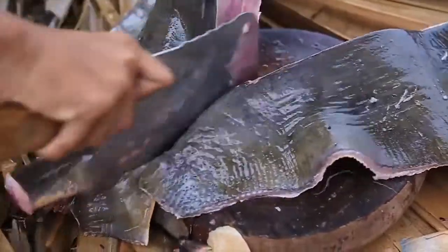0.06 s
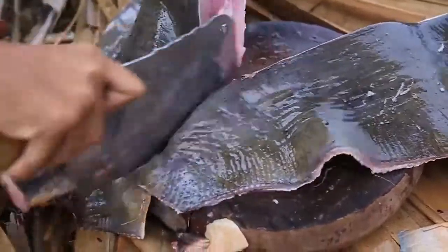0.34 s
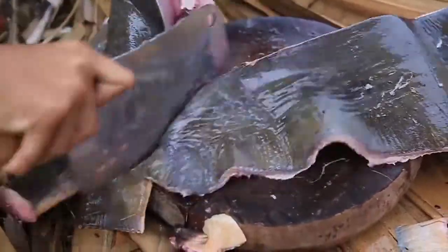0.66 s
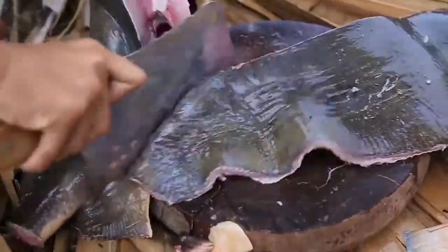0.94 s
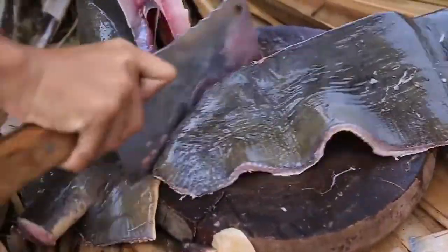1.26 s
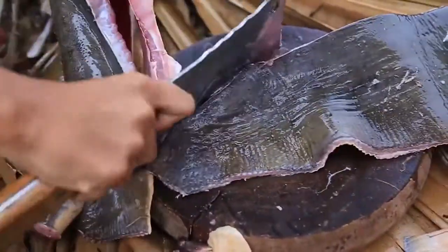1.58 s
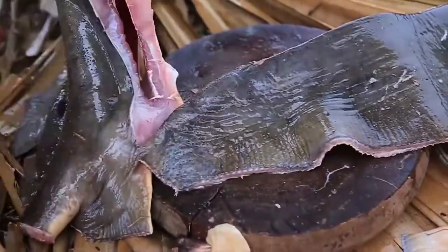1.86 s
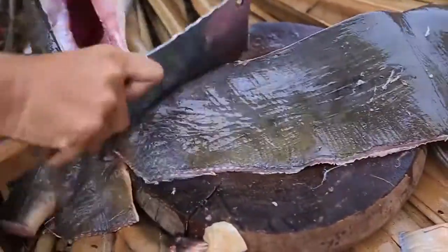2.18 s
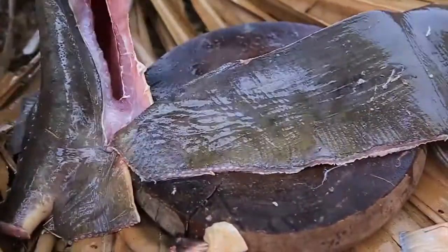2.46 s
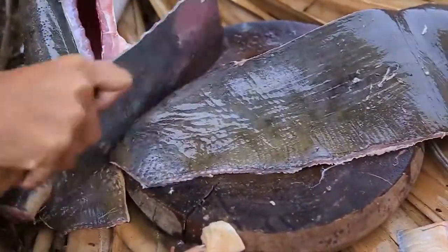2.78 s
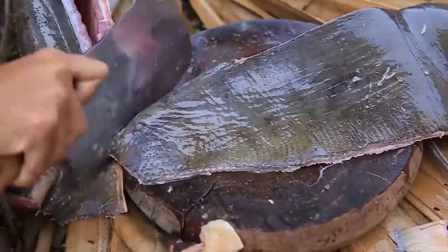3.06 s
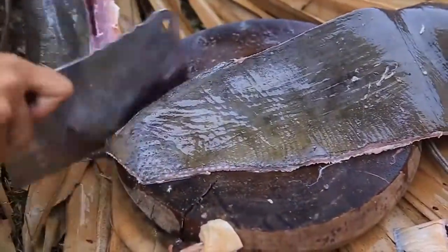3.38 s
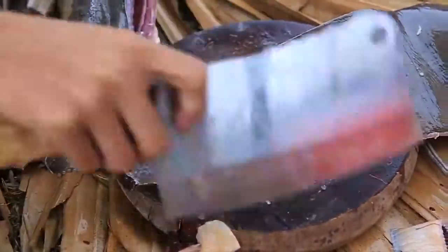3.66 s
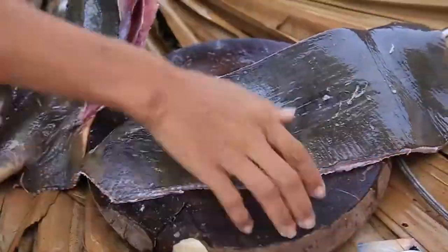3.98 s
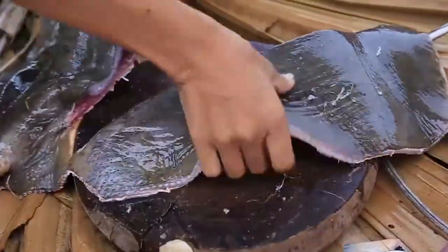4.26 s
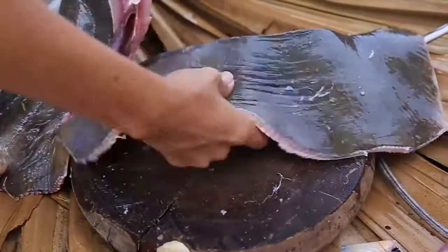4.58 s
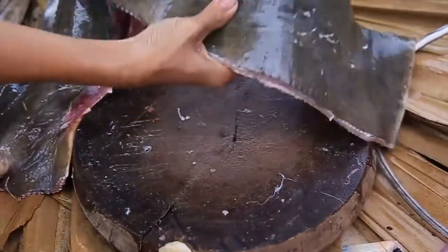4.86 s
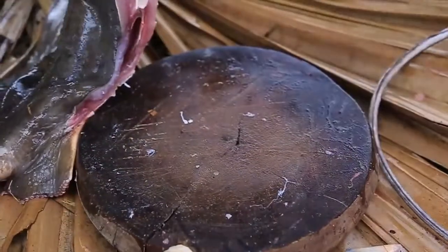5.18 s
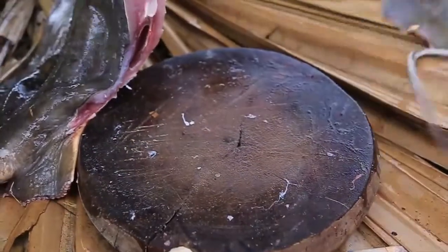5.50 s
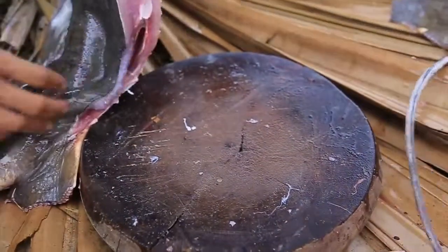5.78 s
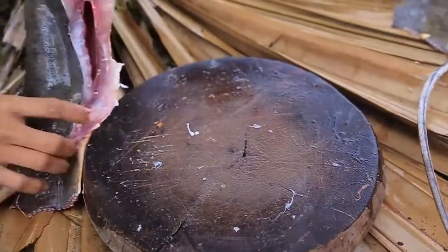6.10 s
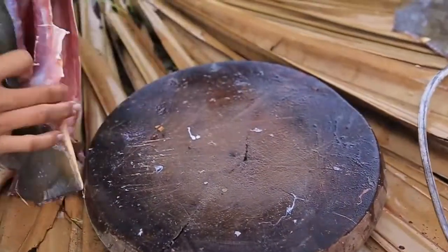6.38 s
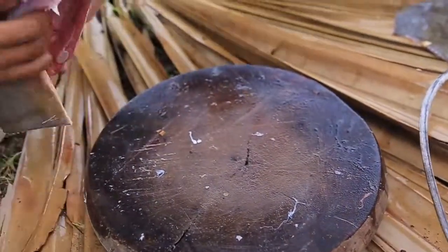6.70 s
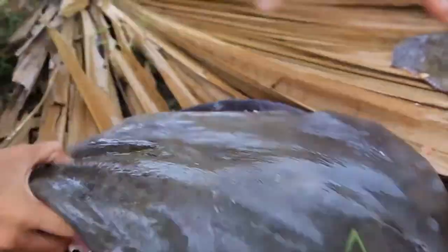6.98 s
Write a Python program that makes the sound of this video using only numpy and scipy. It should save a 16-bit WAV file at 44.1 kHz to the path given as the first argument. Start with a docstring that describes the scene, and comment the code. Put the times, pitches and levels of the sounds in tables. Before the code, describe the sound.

Wet blade scraping, two loud knocks on wood, then fish slapping onto dry leaves and a block, with birds and a faint engine behind.

```python
"""Cutting fish in an open yard

Close to the microphone a cleaver scrapes the wet skin of a big fish on a round wooden block, then
chops through it. A tray is moved, and slabs slap down on dry palm leaves and on the block.
Small birds chirp farther off, a slow diesel engine thumps far away and a light breeze rumbles.
The loud blows overload the recorder and duck its gain."""
import sys
import numpy as np
from scipy import signal
from scipy.fft import rfft, irfft, next_fast_len
from scipy.io import wavfile
from scipy.ndimage import uniform_filter1d

SR = 44100
rng = np.random.default_rng(int(sys.argv[2]) if len(sys.argv) > 2 else 0)


def store_wav(level_fs):
    """Save 16-bit WAV to argv[1]."""
    pcm = np.round(np.clip(np.atleast_2d(level_fs), -1, 1) * 32767)
    wavfile.write(sys.argv[1], SR, pcm.T.astype(np.int16))


N = 319267
TIME = np.arange(N) / SR

# cleaver blows: t/s, force/dB, contact/ms, crack of skin and bone/dB, block pitch factor, ground jolt/dB
BLOWS = [(2.1884, 12, 0.58, -6.5, 1.01, 5.5), (2.316, -4.5, 1.58, -40, 1.01, -18),
         (2.412, -32.5, 1.03, -52, 0.99, -50), (2.6817, 11.5, 0.52, -5.5, 0.95, -0.5),
         (3.2239, -3, 1.63, -46, 1.035, -45), (3.2318, -14.5, 1.5, -58, 0.92, -45)]
# modes of the block with the blade in it: f/Hz, level/dB, t60/s
BLOCK_MODES = [(430, -14, 0.034), (619, -3, 0.03), (718, -3, 0.024), (903, 6, 0.019), (1380, 2.5, 0.021),
               (1612, -0.5, 0.018)]
# blade on the fish: t/s, length/s, hiss/dB, coarse slips over the hiss/dB
SCRAPE_STROKES = [(0, 0.1, -37.5, -1.5), (.151, 0.071, -36, -0.5), (.257, 0.14, -44, -4.5),
                  (.44, 0.1, -36, -4.5), (.588, 0.12, -41, -7.5), (.735, 0.098, -41.5, 2),
                  (.88, 0.1, -47.5, -3), (1.039, .082, -41.5, 6), (1.135, 0.15, -46, -9.5),
                  (1.317, 0.092, -44, 0.5)]  # about seven a second
BLADE_RESTS = [(0.15, 1.284, -55.5, 3.5)]  # staying on the skin between strokes
BLADE_DRAWS = [(2.832, 0.16, -41, -5.5), (3.018, 0.087, -41, 5.5), (3.204, 0.071, -39, -24),
               (3.299, 0.179, -43, -3.5)]  # pulled out of the cut
# resonances of the steel: f/Hz, width/Hz, level/dB
DAMPED_BLADE_MODES = [(3460, 220, 0), (5250, 440, -9), (10400, 960, -4.5)]  # against the flesh
FREE_BLADE_MODES = [(4170, 110, -5), (5140, 150, 7.5), (6100, 300, 6)]  # sliding free
# the blade sticks on the skin: t/s, length/s, start f/Hz, final f/Hz, level/dB
BLADE_SQUEAKS = [(0.053, 0.041, 3800, 3670, -35), (0.191, 0.042, 2380, 1370, -35),
                 (0.93, 0.067, 1170, 1210, -45), (1.137, 0.039, 1390, 2650, -39),
                 (2.82, 0.09, 6030, 5700, -47)]
# landings: t/s, thud/dB, splash/dB, trapped air f/Hz; the first row on the leaves is the tray set down, the
# rest are parts of slabs landing
LANDINGS_ON_LEAVES = [(3.9793, -29, -9.5, 1250), (5.5457, -20, -25, 796), (5.5507, -14, -28, 1240),
                      (5.553, -14, -16, 1090), (5.557, -15, -21, 1460), (5.5636, -19, -18, 1380),
                      (5.5717, -3, -9, 1700), (5.5811, -21, -13, 1400), (5.589, -23, -26, 1100),
                      (5.5994, -30, -18, 1500)]
SLAPS_ON_BLOCK = [(7.0265, -17, -32, 970), (7.039, -9, -24, 948), (7.048, -14.5, -21, 1750),
                  (7.0651, -6, -13, 475), (7.077, -15, -10, 1180), (7.08, -22, -6, 2090)]
# wet flesh spreads during a slap: t/s, length/s, level/dB
FLESH_SPREADS = [(5.548, 0.021, -14.5), (7.025, 0.058, -24)]
# snaps of scales, slime and leaf: t/s, tick/dB, low knock/dB
SHARP_SNAPS = [(0.445, -33, -27), (.5852, -20, -37), (.61, -7, -39), (0.7327, -44, -29.5),
               (1.2795, -31, -30), (1.3205, -38, -30), (1.3445, -20, -28), (1.3644, -16.5, -23),
               (1.404, -22, -45), (1.4314, -40, -27.5), (1.5257, -16, -30.5), (1.6621, -27, -32.5),
               (2.3421, -11.5, -36), (3.269, -10.5, -30.5), (3.378, -12.5, -47), (3.8824, -16.5, -43),
               (4.1664, -24, -41), (5.0236, -30, -34), (5.678, -7, -29), (5.714, -5, -18), (5.742, -2, -28),
               (5.81, -22, -26), (6.2623, -31, -62), (6.4735, -23, -60), (6.9711, -21, -36),
               (7.212, -18.5, -30)]
# sticky skin peels off the leaves: t/s, level/dB
SKIN_PEELS = [(5.849, -38.5), (5.9048, -37), (5.9666, -38), (6.0137, -37.5), (6.027, -45), (6.1138, -37.5),
              (6.2949, -41), (6.464, -37.5)]
# pushes on the dry leaves: t/s, level/dB, swell/s
LEAF_PUSHES = [(3.435, -37, 0.15), (3.886, -29.5, 0.0038), (3.92, -34, 0.0037), (3.991, -26, 0.0091),
               (5.02, -44.5, 0.062), (5.562, -14, 0.005), (5.747, -28.5, 0.064), (6.998, -31.5, 0.01),
               (7.07, -25, 0.032)]
# hand, tray and fish drag over the leaves: t/s, length/s, level/dB
LEAF_DRAGS = [(1.434, 0.47, -55.5), (2.766, 0.86, -54), (4.126, 0.33, -52), (4.472, 0.55, -50),
              (5.606, 0.55, -49), (6.152, 0.33, -54.5), (7.142, 0.1, -38)]
# bird calls, a clear peep dropping to a raspy tail:
# t/s, peep f/Hz, peep/dB, its octave/dB, tail length/s, tail f/Hz, tail/dB, rasp 0-1
TWO_PART_CALLS = [(3.591, 4090, -30.5, -44, 0.096, 3060, -38, 1),
                  (3.765, 4070, -32.5, -44, 0.12, 2670, -36.5, 0.56),
                  (4.116, 4200, -39.5, -54, 0.15, 2860, -40, 0.46),
                  (4.29, 4050, -41.5, -49, 0.102, 2850, -36.5, 0.37),
                  (4.476, 4100, -39, -51, 0.1, 2700, -40.5, 0)]
# whistles falling steeply, then slowly: t/s, length/s, start f/Hz, goal f/Hz, glide/s, level/dB, rasp 0-1
FALLING_WHISTLES = [(3.224, 0.094, 6330, 2410, 0.073, -33.5, 0.06),
                    (3.315, 0.12, 3700, 1905, .11, -37, 0.4), (5.078, 0.023, 4300, 1690, .013, -35, 0.9),
                    (5.137, 0.049, 4500, 3090, 0.015, -40, 0.5), (5.225, 0.05, 5200, 2930, 0.018, -38, .55),
                    (5.304, 0.013, 3300, 1600, 0.013, -35.5, 0.3),
                    (5.316, 0.048, 4700, 3250, 0.019, -39, 0.3),
                    (5.442, 0.014, 7200, 3950, 0.0094, -37, 0.25),
                    (5.455, 0.12, 4600, 2550, .04, -35, 0.45)]
# whistles on one pitch: t/s, length/s, f/Hz, level/dB, rasp 0-1
HELD_WHISTLES = [(4.602, 0.37, 3090, -40.5, 0.36), (4.662, .04, 5950, -38, 0.4),
                 (4.743, 0.14, 2950, -42.5, 0.9), (4.94, 0.38, 3420, -45.5, 0.26),
                 (5.338, 0.08, 3250, -40.5, 0), (5.471, 0.099, 3200, -41, 0)]
# running of the far engine: t/s, firing rate/Hz, level/dB
ENGINE_RUN = [(0, 22.3, -42.5), (1.9, 20.2, -42), (2.5, 20.8, -42), (3.3, 20.7, -42), (4.3, 20.85, -40.5),
              (6.3, 20.2, -39.5), (7.24, 20.3, -37)]
# strength of the breeze: t/s, level/dB
BREEZE_LEVELS = [(0, -44), (1.25, -40), (1.5, -43.5), (3.7, -43), (4.6, -39), (5.8, -44.5), (6.8, -37),
                 (7.24, -45)]
# spectra at the microphone: f/Hz, relative level/dB
FINE_SLIP_SPECTRUM = [(600, -23), (1800, 2), (2800, -8), (4000, 1), (5600, 0), (7000, -2.5), (9800, 0.5),
                      (11500, -7.5), (15500, -11)]
COARSE_SLIP_SPECTRUM = [(150, -36.5), (380, -4.5), (560, 1.5), (750, -3.5), (950, -3), (1900, -10),
                        (3200, -11), (8000, -53)]
THUD_SPECTRUM = [(90, -15), (250, -9), (480, -2.5), (700, -3), (1000, 2.5), (1400, -8.5), (2000, -5.5),
                 (3200, -17.5), (8000, -23)]
LEAF_THUD_SPECTRUM = [(120, -17), (400, -6.5), (750, -6.5), (1350, -1), (1900, -1.5), (3200, -24),
                      (8000, -28)]
SPLASH_SPECTRUM = [(300, -6.5), (1200, 3), (2600, -1), (4200, -3.5), (7000, -12), (10200, -9.5),
                   (12500, -19), (16000, -30)]
SNAP_SPECTRUM = [(500, 6), (2000, 6.5), (4000, 4), (7000, 2), (10200, 6.5), (13000, -8), (16000, -3)]
STICKY_SPECTRUM = [(500, -20), (2500, 4), (5000, -2), (16000, -18)]
FROND_SPECTRUM = [(120, -49), (400, -7.5), (1100, 0), (1900, -2.5), (3000, -3.5), (4500, -8), (7000, -14),
                  (10000, -14), (16000, -29)]
HOARSE_SPECTRUM = [(1800, -33), (3000, 2), (4200, -4), (5600, 1), (6800, -3.5), (8000, -17), (12000, -20)]
EXHAUST_SPECTRUM = [(20, -8), (60, -9), (130, 2.5), (260, -2.5), (350, -5), (440, -9), (540, -28),
                    (900, -39.5)]
BREEZE_SPECTRUM = [(10, -3), (25, 5), (45, -7), (90, -7.5), (200, -13), (500, -65.5)]
AIR_SPECTRUM = [(400, -0.5), (1000, -5.5), (1800, -5.5), (4000, -9.5), (7500, -15.5), (10000, -17),
                (16000, -27.5)]


def chopping(bite_s=0.0086, bite_db=-25, thump_s=0.0012):
    """The blade crunches in, cracks through and pushes the block; soft flesh gives a long, dull push."""
    knock, crunch, thump = np.zeros((3, N))
    t = TIME[:SR // 8]
    for s, force_db, contact_ms, _, pitch, jolt_db in BLOWS:
        push = np.sin(np.pi * np.minimum(t * 1000 / contact_ms, 1)) ** 2
        ring = sum(amp(db - 60 * t / t60) * np.sin(2 * np.pi * hz * pitch * t)
                   for hz, db, t60 in BLOCK_MODES)
        add(knock, s, amp(force_db) * signal.fftconvolve(ring, push / push.sum())[:len(t)])
        bite = np.sqrt(np.linspace(0, 1, round(bite_s * SR)))
        add(crunch, s - bite_s, amp(jolt_db + bite_db) * bite * rng.standard_normal(len(bite)))
        add(thump, s, amp(jolt_db) * t / thump_s * np.exp(-t / thump_s))  # the ground is jolted
    knock = butter(knock, 340, "high")  # a small block radiates little bass
    s, _, _, crack_db, _, _ = np.transpose(BLOWS)
    crack = bursts(s, crack_db + 16, decay_s=0.0023, rise_s=0.00008)
    return knock + thump + colour(crunch + crack, SPLASH_SPECTRUM)


def scraping():
    """The edge slips over tiny ridges of wet skin: fine hiss, coarser slips and crackling slime."""
    # after a chop the blade sinks on through the flesh, longer and louder for a harder blow
    sinks = [(s, 0.076 * 2 ** (force_db / 21.5), -44 + 0.45 * force_db, 5.5) for s, force_db, *_ in BLOWS]
    hiss, body = pressure(SCRAPE_STROKES + BLADE_RESTS + BLADE_DRAWS + sinks)
    grit = amp(2.1 * wander(124))
    fine = colour(grains(per_s=5000, spread_db=2.5) * hiss * grit, FINE_SLIP_SPECTRUM)
    coarse = colour(grains(per_s=3500, spread_db=0) * body * grit, COARSE_SLIP_SPECTRUM)
    squelch = wet_pops(amp(-2.5) * body, per_s=220, cycles=2, low_hz=576, high_hz=2920)
    crackle = colour(grains(per_s=260, spread_db=3.5) * hiss * amp(-5), STICKY_SPECTRUM)
    slips = amp(-0.35) * (fine + blade(fine, DAMPED_BLADE_MODES)) + amp(-0.4) * coarse
    return patchy(slips, depth_db=3.5) + squelch + crackle


def pressure(strokes, edge_s=0.021, hiss_arch=0.19, body_arch=0.09):
    """Levels of hiss and of coarse slips; each stroke presses hardest in its middle."""
    hiss, body = np.zeros((2, N))
    for start, length, db, coarse_db in strokes:
        level = amp(db) * contact(start, length, edge_s)
        off_centre = np.clip(2 * (TIME - start) / length - 1, -1, 1) ** 2
        hiss += level * (1 - hiss_arch * off_centre)
        body += level * amp(coarse_db) * (1 - body_arch * off_centre)
    return hiss, body


def blade(friction, modes):
    """Friction sets the blade ringing faintly."""
    return sum(amp(db) * signal.lfilter(*signal.iirpeak(hz, hz / width, fs=SR), friction)
               for hz, width, db in modes)


def drawing(ring_db=3):
    """Steel sings faintly as the blade slides free."""
    hiss, _ = pressure(BLADE_DRAWS)
    return blade(amp(ring_db) * hiss * rng.standard_normal(N), FREE_BLADE_MODES)


def squeaking(width_hz=260, slip_hz=110):
    """Brief, gliding stick-slip squeaks of the blade, roughened by uneven slips."""
    out, fuzz, jitter = np.zeros(N), wander(width_hz), slip_hz * wander(940)
    for s, length, start_hz, final_hz, db in BLADE_SQUEAKS:
        at = np.arange(round(s * SR), round((s + length) * SR))
        turns = np.cumsum(np.linspace(start_hz, final_hz, len(at)) + jitter[at]) / SR
        add(out, s, 2 * amp(db) * np.hanning(len(at)) * fuzz[at] * np.sin(2 * np.pi * turns))
    return out


def slapping(pocket_db=3, pocket_cycles=4.8, pocket_rise_s=0.00037):
    """The tray is set down and limp slabs land in parts, each a thud, a splash and a pop of air; spreading
    flesh squelches."""
    out, t = np.zeros(N), TIME[:SR // 20]
    for slaps, surface in (LANDINGS_ON_LEAVES, LEAF_THUD_SPECTRUM), (SLAPS_ON_BLOCK, THUD_SPECTRUM):
        s, thud_db, splash_db, _ = np.transpose(slaps)
        out += colour(bursts(s, thud_db + 4.5, decay_s=0.0034, rise_s=0.0009), surface)
        out += colour(bursts(s, splash_db + 6, decay_s=0.0032, rise_s=0.00044), SPLASH_SPECTRUM)
    for s, db, _, hz in LANDINGS_ON_LEAVES + SLAPS_ON_BLOCK:
        envelope = (1 - np.exp(-t / pocket_rise_s)) * np.exp(-hz * t / pocket_cycles)
        add(out, s, amp(db + pocket_db) * envelope * np.sin(2 * np.pi * hz * t))
    spread = sum(amp(db) * contact(s, length, edge_s=0.005) for s, length, db in FLESH_SPREADS)
    return out + colour(spread * rng.standard_normal(N), LEAF_THUD_SPECTRUM)


def snapping():
    """Scales, slime and leaf snap sharply, each with a short knock of what lies beneath."""
    s, tick_db, knock_db = np.transpose(SHARP_SNAPS)
    ticks = bursts(s, tick_db - 8.5, decay_s=0.0022, rise_s=0.00006)
    knocks = bursts(s, knock_db + 3, decay_s=0.0033, rise_s=0.00035)
    return colour(ticks, SNAP_SPECTRUM) + colour(knocks, THUD_SPECTRUM)


def peeling():
    """Each bit of skin lets go of the leaves in a quick cluster of tiny ticks."""
    s, db = np.transpose(SKIN_PEELS)
    ticks = bursts(s, db, decay_s=0.0054, rise_s=0.0002)
    return colour(ticks * amp(5.5 * wander(600)), STICKY_SPECTRUM)


def stirring(settle_s=0.051):
    """How hard the leaves are moved: pushes that swell and settle, and light dragging."""
    pushes = sum(amp(db) * np.exp(-np.maximum((s - TIME) / swell_s, (TIME - s) / settle_s))
                 for s, db, swell_s in LEAF_PUSHES)
    drags = sum(amp(db) * contact(s, length, edge_s=0.016) for s, length, db in LEAF_DRAGS)
    return np.hypot(pushes, drags)


def leaves(stir):
    """Dry fronds crackle in clumps as they are stirred."""
    crackle = grains(per_s=3500, spread_db=1.5) * stir * amp(3.2 * wander(94) + 1)
    return patchy(colour(crackle, FROND_SPECTRUM), depth_db=2.5)


def slime(stir, idle_db=-62, tick_db=-36):
    """Wet skin lets go in faint ticks and pops, louder while the hand moves the fish."""
    handling = np.sqrt(stir)
    ticks = grains(per_s=170, spread_db=4) * (amp(idle_db) + amp(tick_db) * handling)
    pops = wet_pops(amp(-28.5) * handling, per_s=110, cycles=2.5, low_hz=890, high_hz=7000)
    return colour(ticks, SNAP_SPECTRUM) + pops


def wet_pops(level, per_s, cycles, low_hz, high_hz):
    """Tiny wet pops at many pitches, each ringing for a few cycles."""
    out, t = np.zeros(N), TIME[:SR // 40]
    for when, pitch, chance, sign in rng.random((int(per_s * N / SR), 4)):
        hz, at = low_hz * (high_hz / low_hz) ** pitch, int(when * N)
        ring = np.sin(2 * np.pi * hz * t) * np.exp(-hz * t / cycles)
        size = np.sign(sign - 0.5) * (chance + 0.0078) ** -0.4  # most are small, a few stand out
        add(out, at / SR, level[at] * size * np.sqrt(SR / per_s) / 2 * ring / np.linalg.norm(ring))
    return out


def birds(rasp_hz=620, waver_hz=32, steep_hz_per_s=9000, third_re_octave_db=-12):
    """Whistles with up to two overtones; raspy notes carry a fuzzy band around a thin core."""
    out, flutter, waver = np.zeros(N), amp(2.55 * wander(130)), waver_hz * wander(236)
    fuzz = (wander(rasp_hz) + 1j * wander(rasp_hz)) / np.sqrt(2)
    for s, hz, db, octave_db, rasp in bird_notes():
        at = round(s * SR) + np.arange(len(hz))
        unsteady = np.sqrt(1 + abs(np.gradient(hz)) * SR / steep_hz_per_s)  # steep glides waver most
        tone = np.exp(2j * np.pi * np.cumsum(hz + unsteady * waver[at]) / SR)
        third = amp(third_re_octave_db) * (3 * hz < SR / 2) * tone ** 3
        whistle = amp(db) * tone + amp(octave_db) * (tone ** 2 + third)
        rasp = np.clip(rasp, 0, 1)
        roughness = np.sqrt(1 - rasp) + np.sqrt(rasp) * fuzz[at]
        envelope = np.sqrt(abs(np.sin(np.pi * np.linspace(0, 1, len(at)))))
        add(out, s, envelope * flutter[at] * (roughness * whistle).real)
    return out


def bird_notes(peep_s=0.039, rise_hz=202, arch_hz=69.5, peep_rasp=0.056,
               tail_delay_s=0.031, sag_hz=89, fade_db=6):
    """Every note as t/s, pitch curve/Hz, level/dB, octave/dB, rasp; falling whistles fade and clear."""
    for s, peep_hz, peep_db, octave_db, tail_s, tail_hz, tail_db, rasp in TWO_PART_CALLS:
        u = np.linspace(-1, 1, round(peep_s * SR))
        peep = peep_hz + rise_hz * u / 2 + arch_hz * (0.5 - u ** 2)
        yield s, peep, peep_db, octave_db, peep_rasp
        tail = tail_hz - sag_hz * np.linspace(-0.5, 0.5, round(tail_s * SR))
        yield s + tail_delay_s, tail, tail_db, tail_db - 24, rasp
    for s, length, start_hz, goal_hz, glide_s, db, rasp in FALLING_WHISTLES:
        t = TIME[:round(length * SR)]
        glide = goal_hz + (start_hz - goal_hz) * np.exp(-t / glide_s)
        early = 0.5 - t / length
        fading_db = db + fade_db * early
        yield s, glide, fading_db, fading_db - 18, rasp * (1 + 2 * early)
    for s, length, hz, db, rasp in HELD_WHISTLES:
        yield s, np.full(round(length * SR), hz), db, -np.inf, rasp


def hoarse_call(peak_s=4.635, peak_db=-42.5, swell_s=0.12, fade_s=0.41):
    """A scolding bird's long hoarse hiss swells quickly and fades."""
    width_s = np.where(TIME < peak_s, swell_s, fade_s)
    envelope = amp(peak_db) * np.exp(-((TIME - peak_s) / width_s) ** 2)
    return colour(rng.standard_normal(N) * envelope, HOARSE_SPECTRUM)


def engine(start_cycle=0.02, puff_share=0.25, pop_lag=0.12, drone=0.46):
    """Each firing of one distant diesel cylinder is a dull pop and a puff of exhaust."""
    s, firing_hz, db = np.transpose(ENGINE_RUN)
    cycles = start_cycle + np.cumsum(np.interp(TIME, s, firing_hz)) / SR
    puffs = unit((drone + np.exp(-(cycles % 1) / puff_share)) * rng.standard_normal(N))
    firings = np.diff(np.floor(cycles - pop_lag), prepend=-1)
    pops = unit(firings * amp(2 * wander(24)))
    return colour((amp(-3) * puffs + amp(-8) * pops) * amp(np.interp(TIME, s, db)), EXHAUST_SPECTRUM)


def air():
    """Low rumble of a light breeze and the hiss of the open yard."""
    rumble = unit(colour(rng.standard_normal(N), BREEZE_SPECTRUM))
    gusts = amp(np.interp(TIME, *np.transpose(BREEZE_LEVELS)) + 3.5 * wander(1.9))
    hiss = colour(rng.standard_normal(N), AIR_SPECTRUM) * amp(-48 + 0.097 * wander(2.4))
    return rumble * gusts + hiss


def yard(x, low_t60=0.42, high_t60=0.12, delay_s=0.012):
    """Scattered echoes reach the microphone from ground, walls and trees; the treble dies first."""
    out, t = np.zeros(N), TIME[:SR // 2]
    taps = rng.standard_normal(len(t)) * (rng.random(len(t)) < 0.1)
    low = butter(butter(taps, 2200, "low"), 600, "high")
    high = butter(taps, 2500, "high")
    tail = low * amp(-60 * t / low_t60) + 1.1 * high * amp(-60 * t / high_t60)
    add(out, delay_s, signal.fftconvolve(x, tail / np.linalg.norm(tail)))
    return out


def amp(db):
    """Decibels to gain."""
    return 10 ** (np.asarray(db) / 20)


def unit(x):
    """Scales to rms 1."""
    return x / np.sqrt(np.mean(x ** 2) + 1e-20)


def add(mix, s, sound):
    """Mixes a sound in at time s."""
    part = mix[max(0, round(s * SR)):][:len(sound)]
    part += sound[:len(part)]


def butter(x, hz, kind):
    """Second-order low-pass or high-pass."""
    return signal.sosfilt(signal.butter(2, hz, kind, fs=SR, output="sos"), x)


def colour(x, spectrum, size=4096):
    """Causal filter with the given spectrum; white noise keeps its level."""
    hz, db = np.transpose(spectrum)
    log_hz = np.log(abs(np.fft.fftfreq(size, 1 / SR)) + 1)
    log_gain = np.log(amp(np.interp(log_hz, np.log(hz), db)))
    taps = np.fft.ifft(np.exp(np.conj(signal.hilbert(log_gain)))).real[:size // 2]  # minimum phase
    return signal.oaconvolve(x, taps / np.linalg.norm(taps))[:len(x)]


def wander(rate):
    """Smooth random curve of rms 1 that changes about rate times a second."""
    size = next_fast_len(N)
    hz = np.fft.rfftfreq(size, 1 / SR)
    return unit(irfft(rfft(rng.standard_normal(size)) * np.exp(-(hz / rate) ** 2))[:N])


def grains(per_s, spread_db):
    """Random clicks of uneven size, rms 1."""
    size = amp(spread_db * np.minimum(rng.exponential(1, N), 4)) * rng.choice([-1, 1], N)
    return unit(size * (rng.random(N) < per_s / SR))


def patchy(x, depth_db, size=512):
    """Brief resonances come and go as the contact point moves."""
    frames = signal.stft(x, nperseg=size)[2]
    patches = uniform_filter1d(rng.standard_normal(frames.shape), size=6, axis=0)
    patches = unit(uniform_filter1d(patches, size=5, axis=1))
    return signal.istft(frames * amp(depth_db * patches), nperseg=size)[1][:N]


def bursts(times, levels_db, decay_s, rise_s):
    """Noise bursts with a quick rise and an exponential fall."""
    out, t = np.zeros(N), TIME[:SR // 10]
    shape = (1 - np.exp(-t / rise_s)) * np.exp(-t / decay_s)
    for s, db in zip(times, levels_db):
        add(out, s, amp(db) * shape * rng.choice([-1, 1], len(t)))
    return out


def contact(start, length, edge_s):
    """Soft-edged gate: 1 while two things touch."""
    touch = 1 + np.tanh((TIME - start) / edge_s * 2)
    release = 1 + np.tanh((start + length - TIME) / edge_s * 2)
    return touch * release / 4


def scene():
    """One microphone close to the block, birds and engine farther off; the chops stay nearly dry."""
    stir = stirring()
    work = (scraping() + drawing() + squeaking() + slapping() + snapping() + peeling()
            + leaves(stir) + slime(stir))
    chops = chopping()
    song = birds() + hoarse_call()
    echoes = yard(amp(-23.5) * work + amp(-34) * chops + amp(-7) * song)
    return (work + chops + song + echoes + engine() + air())[None]


def record(dry, threshold_db=-19, slope=0.9, most_db=11, recovery_db_per_s=55, attack_s=0.032,
           top_hz=16150):
    """The recorder ducks its gain after loud blows, too late to stop them clipping; then a low-pass."""
    power = uniform_filter1d(dry[0] ** 2, size=441, origin=220)  # over the last 10 ms
    power_db = 10 * np.log10(abs(power) + 1e-12)
    over_db = np.clip(slope * (power_db - threshold_db), 0, most_db)
    recovery_db = TIME * recovery_db_per_s
    held_db = np.maximum.accumulate(over_db + recovery_db) - recovery_db
    pole = np.exp(-1 / (attack_s * SR))
    duck_db = signal.lfilter([1 - pole], [1, -pole], held_db)
    clipped = np.clip(dry * amp(-duck_db), -1, 1)
    low_pass = signal.firwin(511, top_hz, window=("kaiser", 9), fs=SR)
    return signal.oaconvolve(clipped, low_pass[None], "same")


dry = scene()
out = record(dry)
store_wav(out)
```